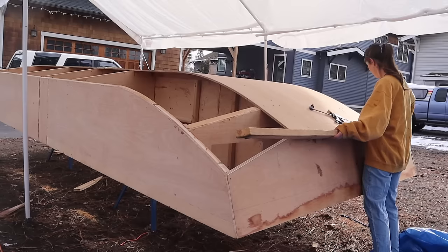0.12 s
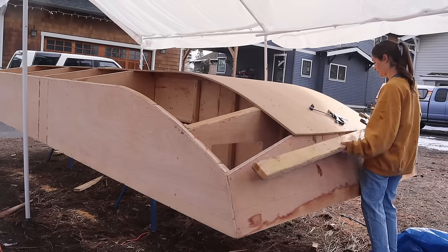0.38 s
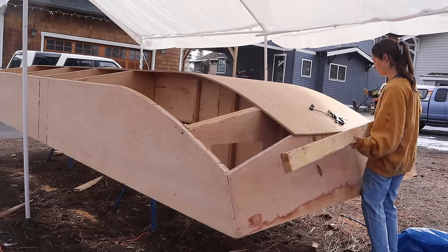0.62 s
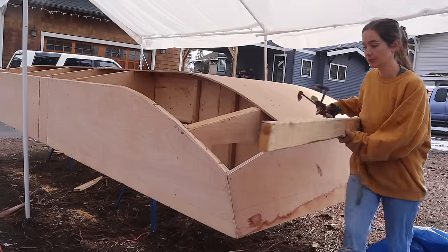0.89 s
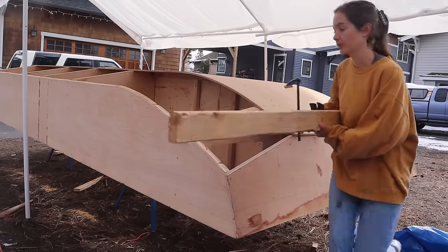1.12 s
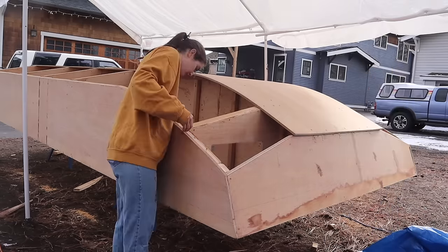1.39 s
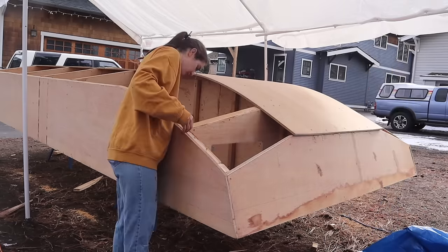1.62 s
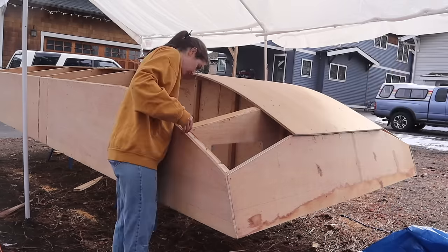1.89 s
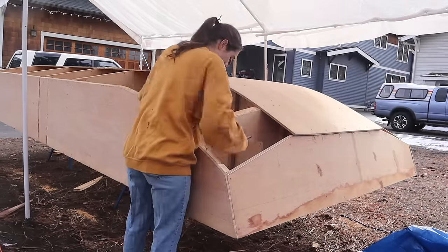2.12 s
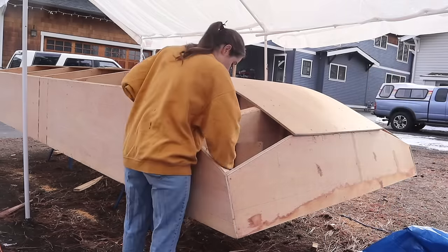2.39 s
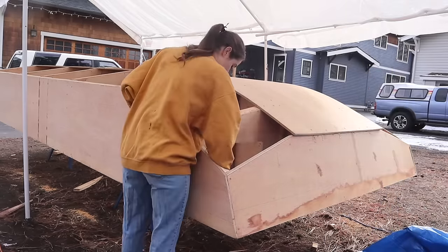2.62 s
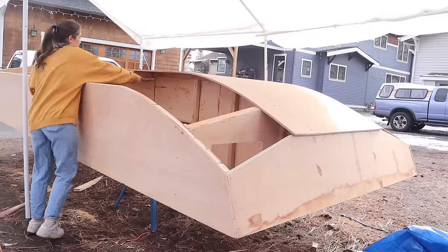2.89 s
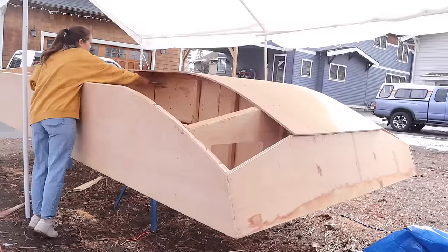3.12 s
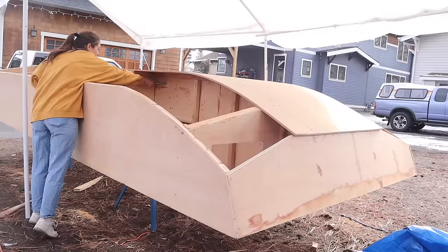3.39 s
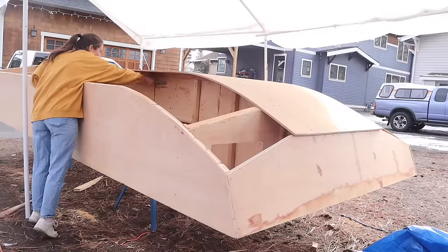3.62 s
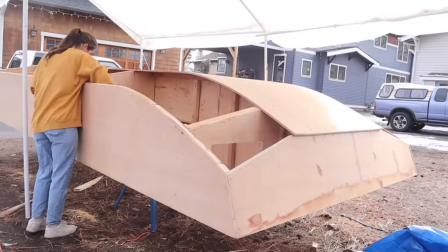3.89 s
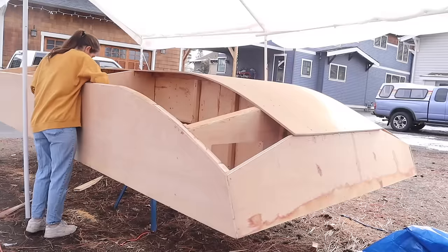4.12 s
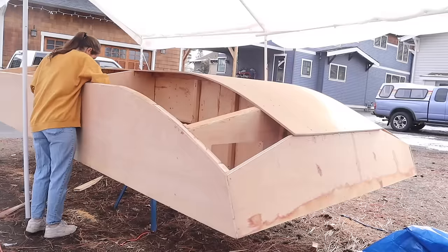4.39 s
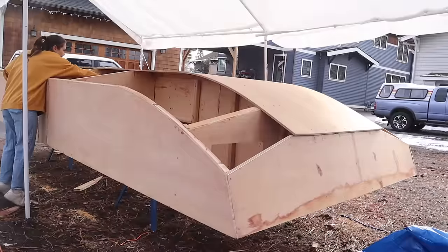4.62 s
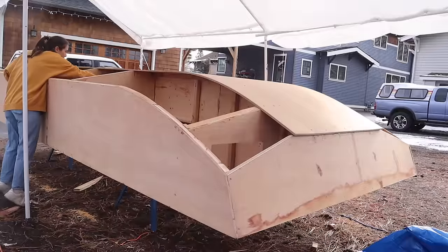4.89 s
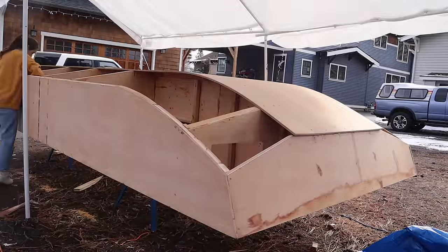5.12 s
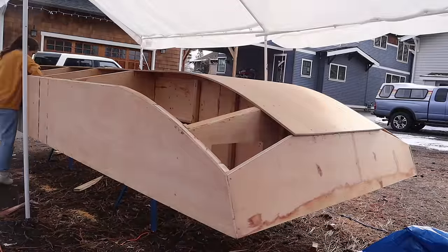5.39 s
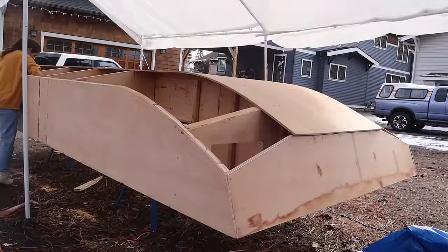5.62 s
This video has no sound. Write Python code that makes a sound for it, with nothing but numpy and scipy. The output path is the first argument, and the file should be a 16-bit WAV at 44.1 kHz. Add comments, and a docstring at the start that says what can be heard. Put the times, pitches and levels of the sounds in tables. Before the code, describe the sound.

A quiet yard with distant traffic hum and thin leaf hiss, heard closely in stereo. From 0 to 0.4 s, soft knocks on a hollow plywood hull build to a low, boomy thump. At 0.83 s a cut brings a short plank tap and crunching steps on dry litter until about 1.4 s, with sharp twig or cloth ticks. A dull bump at 1.39 s leads into a lull. Around 2.47 s a very loud, tight cluster of woody bangs rings out and is chopped at 2.82 s. More hollow knocks fall at 3.1-3.6 s, a faint metallic clamp rattle near 3.75 s, then sharper raps at 3.95 and 4.35 s. After a cut at 4.49 s, two knocks land around 4.6 s; a small bird whistles faintly at 4.5 and 4.8-5.0 s. Final loud blows at 5.1-5.2 s and a dull thud at 5.28 s decay into yard air, with slight ticks at 5.7 s.

```python
"""A yard: under a canopy, timber and tools knock against an upturned plywood hull.
The hollow hull rings and booms as sums of dying sines; a steel clamp and a loose plank do so more simply.
Boots crunch on dry litter and twigs tick (bursts of noise), a small bird warbles (gliding sines),
far traffic hums and leaves hiss (shaped noise).
Two close microphone ports hear it; loud blows overload, and splices stop some rings dead."""
import sys
import numpy as np
from scipy import signal
from scipy.fft import rfft, irfft, next_fast_len
from scipy.io import wavfile
from scipy.ndimage import uniform_filter1d

SR = 44100
rng = np.random.default_rng(int(sys.argv[2]) if len(sys.argv) > 2 else 0)


def store_pcm(level_fs):
    """Save levels as 16-bit WAV."""
    pcm = np.round(np.clip(level_fs, -1, 1) * 32767).astype(np.int16)
    wavfile.write(sys.argv[1], SR, np.atleast_2d(pcm).T)


def nominal_scale(level):
    """Amplitude ratio for a level in decibels (scalar or array-like)."""
    x = np.asarray(level, float) / 20
    return 10 ** x


N = 253575  # length of the scene in samples

# moments where rings stop and the yard noise steps in level: [t/s]
SPLICES = [.828, 1.388, 2.13, 2.821, 4.494, 5.13]


def at_hz(points, hz, column=1):
    """Read a table column at any pitch, along straight lines on log frequency."""
    points = np.array(points)
    return np.interp(np.log(hz), np.log(points[:, 0]), points[:, column])


def rms_one(x):
    """Scale a sound to an rms of 1."""
    return x / np.sqrt(np.mean(x ** 2) + 1e-20)


def coloured(x, spectrum):
    """Shape a steady sound to a spectrum."""
    hz = np.maximum(np.fft.rfftfreq(N, 1 / SR), 1)
    return irfft(rfft(x) * nominal_scale(at_hz(spectrum, hz)), N)


def drift(rate):
    """Wander at random: walk through random values at `rate` of them a second, joined by straight lines."""
    knots = rng.standard_normal(int(N / SR * 40) + 2)   # enough for rates up to 40
    return np.interp(np.arange(N) / SR * rate, np.arange(len(knots)), knots)


def ports(x, left_db, left_lag_us):
    """The nearer port hears a source sooner, and louder where the body shades short waves."""
    size = next_fast_len(N + 64)
    hz = np.fft.rfftfreq(size, 1 / SR)
    # each port gets half of the lag and half of the level difference, in opposite directions
    turn = np.exp(-1j * np.pi * hz * left_lag_us / 10 ** 6)
    turn = turn * nominal_scale(left_db / 2 * hz / (hz + 250))
    return irfft(rfft(x, size) * np.array([turn, 1 / turn]), size)[:, :N]


def modes(rows, t):
    """One dying sine for each row of (Hz, dB, seconds to fall by 60 dB)."""
    hz, level_db, t60 = np.transpose(rows)[:, :, None]
    return nominal_scale(level_db - 60 * t / t60) * np.sin(2 * np.pi * hz * t)


def diffuse(spectrum, low_hz, high_hz):
    """Noise from all round: alike at both ports in the bass, opposed in the treble; rms 1 between the pitches."""
    # how alike left and right are, 1 = same, -1 = opposed: [f/Hz, likeness]
    likeness = [(60, 1), (180, 0.98), (300, 0.78), (520, 0.7), (900, 0.11), (1500, -0.045), (2600, -0.65),
                (5000, -0.54), (10000, -0.54)]
    hz = np.maximum(np.fft.rfftfreq(N, 1 / SR), 1)
    alike = np.clip(at_hz(likeness, hz), -.99, .999)
    noise = rfft(rng.standard_normal((2, N))) * nominal_scale(at_hz(spectrum, hz))
    mid, side = noise * np.sqrt([1 + alike, 1 - alike])
    band = (hz > low_hz) & (hz < high_hz)
    scale = np.sqrt(2 * np.sum(np.abs(mid[band]) ** 2)) / N
    return irfft(np.array([mid + side, mid - side]), N) / scale


def yard():
    """Far traffic hums, leaves hiss, thin air noise flickers on top; the levels step at each splice."""
    # mean levels in each stretch between splices: [hum level/dB, hiss level/dB, air level/dB]
    stretches = [(-44, -61, -69), (-46.5, -57.5, -67.5), (-46.5, -56, -72.5), (-46, -61, -71),
                 (-47, -60, -68), (-50, -62.5, -69), (-47.5, -61, -71)]
    # relative spectrum of the traffic hum: [f/Hz, level per Hz/dB]
    hum_spectrum = [(20, 1.5), (40, 5.5), (110, 13), (200, 4.5), (400, -1), (800, -0.5), (1300, -8),
                    (2000, -21.5), (3000, -23), (9000, -62)]
    # relative spectrum of the leaves: [f/Hz, level per Hz/dB]
    hiss_spectrum = [(1000, 13), (1800, 8.5), (3000, 5), (4000, -1), (6000, -16), (9000, -38), (15000, -50)]
    # relative spectrum of the thin air noise: [f/Hz, level per Hz/dB]
    air_spectrum = [(3000, -4), (5000, 1.5), (8000, -1.5), (11000, -5), (13000, -10.5), (15000, -35)]
    stretch = np.searchsorted(SPLICES, np.arange(N) / SR)
    hum_db, hiss_db, air_db = np.transpose(stretches)[:, stretch]
    hum = nominal_scale(hum_db + 1.0 * drift(9)) * diffuse(hum_spectrum, 300, 1200)
    hiss = nominal_scale(hiss_db + 1.5 * drift(25)) * diffuse(hiss_spectrum, 2000, 5000)
    air = nominal_scale(air_db + 3.0 * drift(30)) * diffuse(air_spectrum, 5000, 14000)
    return hum + hiss + air


def contact(hard_hz, contact_ms):
    """A blow is a chatter of tiny hits: hard ones are bright and hardly move the low modes."""
    chance = rng.random((3, 4000))
    u = np.arange(4000) / (SR * max(contact_ms, .5) / 1000)
    hits = (chance[0] < 2500 / SR) * (0.29 + 1.0 * chance[1]) * np.sign(chance[2] - .5)
    chatter = hits * np.sqrt(u) * np.exp(-u ** 3)
    chatter[0] = 2.27 / max(contact_ms, .5)   # a short contact is one clean blow, a long one swells
    dull = signal.butter(2, np.clip(hard_hz, 50, 15000), fs=SR, output="sos")
    thin = signal.butter(1, np.clip(0.15 * hard_hz, 20, 5000), "high", fs=SR, output="sos")
    return signal.sosfilt(thin, signal.sosfilt(dull, chatter))


def hull():
    """Each blow cracks on the board and strikes all modes anew; gives direct and scattered sound."""
    # blows: [t/s, ring level/dB, contact hardness f/Hz, contact length/ms, boom level against the ring/dB]
    blows = [(0.058, -42, 600, 18, 3), (.137, -36, 820, 11.6, -27), (.274, -34, 600, 14, -40),
             (.353, -20, 700, 22, -1.5), (0.384, -29, 300, 48, 10), (1.389, -26, 510, 10, -41),
             (2.464, -5.5, 1166, 2.8, -29), (2.487, -8, 1290, 6.5, -35), (2.498, -8.5, 1200, 27.3, -45),
             (3.086, -14, 970, 10.8, -7.5), (3.182, -5, 1620, 12.4, -19), (3.238, -30, 820, 6.7, -16),
             (3.362, -15, 1065, 8.8, -36), (3.371, -12.5, 1650, 17.2, -12), (3.597, -30.5, 600, 25, -12),
             (3.955, -10.5, 1200, 2.04, -45), (3.982, -22.5, 475, 10, -16.5),
             (4.013, -23.5, 450, 12.8, -19), (4.3469, -11.5, 2250, 1.14, -34),
             (4.3749, -11, 2330, 1.77, -33), (4.380, -30.5, 2100, 310, -14), (4.451, -20.5, 670, 36, -10),
             (4.565, -13, 1510, 20.7, -18), (4.654, -6, 1210, 11.7, -17), (5.088, -12.5, 1470, 10.5, -33),
             (5.098, -3.5, 1840, 20, -24.5), (5.201, -4, 1600, 25.9, -23), (5.282, -19.5, 403, 40, -8)]
    # main panel modes: [f/Hz, relative level/dB, time to fall by 60 dB/s]
    panels = [(246.6, -4, 1), (282, -13, 0.5), (316, -6, 0.89), (361.4, 4, 0.42), (374, -11, 0.85),
              (475, -7, 0.44), (486, 11, 0.22), (510, -13, 0.19), (630, -4, 0.46), (687, -0.5, 0.31),
              (712, 5.5, 0.15), (746, -2.5, 0.33), (930, -8, 0.26), (929, -11, .15), (1130, -10, 0.17),
              (1220, -29.5, .2), (1238, 13, 0.046), (1340, -17.5, 0.12), (1570, -13, .2), (1547, 13, 0.044)]
    # air in the hollow hull: [f/Hz, relative level/dB, time to fall by 60 dB/s]
    air_modes = [(134.8, 0, 0.67), (156.1, -0.5, .6)]
    # dry crack of the struck spot: [share of the hardness pitch, time to fall by 60 dB/ms, relative level/dB]
    board = [(0.504, 12.6, -5), (1.3, 1.09, 2.5), (3.2, 0.73, 7.5)]
    # the crowd of fine modes and canopy echoes: [f/Hz, relative level/dB, time to fall by 60 dB/s]
    crowd_curve = [(176, -13, 0.79), (300, -6.5, 0.52), (600, -6, 0.39), (1200, -9, 0.32),
                   (2000, -13, 0.29), (4260, -17, 0.19), (9000, 6.5, 0.066)]
    t = np.arange(int(.7 * SR)) / SR
    hz = np.geomspace(170, 9000, 260) * rng.uniform(.99, 1.01, 260)
    crowd = modes(np.transpose([hz, at_hz(crowd_curve, hz), at_hz(crowd_curve, hz, column=2)]), t)
    body = np.vstack([modes(panels, t), crowd])
    boom = modes(air_modes, t).sum(axis=0) * (1 - np.exp(-t / 0.0039))   # the trapped air is slow to move
    no_bass = signal.butter(4, 280, "high", fs=SR, output="sos")
    out = np.zeros((2, N + 2 * len(t)))
    for s, level_db, hard_hz, contact_ms, boom_db in blows:
        strengths = rng.uniform(0.73, 0.76, (2, len(body))) * rng.choice([-1, 1], (2, len(body)))
        blow = contact(hard_hz, contact_ms)
        ring = signal.fftconvolve(strengths @ body, blow[None], axes=1)
        onset = ring[0, :int((contact_ms / 1000 + .02) * SR)]
        ring /= 3 * np.sqrt(np.mean(onset ** 2))
        crack_rows = [(share * hard_hz, db, t60_ms / 1000) for share, t60_ms, db in board]
        crack = modes(crack_rows, t).sum(axis=0)
        crack = signal.sosfilt(no_bass, crack)   # a small patch radiates no bass
        crack = signal.fftconvolve(crack, blow)
        crack_db = 15 - 2.5 * np.log2(contact_ms)   # longer contacts crack less
        ring[0] += nominal_scale(crack_db) * crack / np.abs(crack).max()
        ring[0, :len(t)] += nominal_scale(boom_db) * boom
        # the next splice stops the ring, with a 3 ms fade
        left_s = min([cut - s for cut in SPLICES if cut > s] + [9])
        ring *= np.clip((left_s - np.arange(ring.shape[1]) / SR) / .003, 0, 1)
        at = round(s * SR)
        out[:, at:at + ring.shape[1]] += nominal_scale(level_db) * ring
    return out[:, :N]


def ticks():
    """Twigs and cloth: a sharp snap and a short bright rustle, stronger across the ports."""
    # clear ticks: [t/s, level before filtering/dB]
    clear = [(0.233, -39), (0.7558, -38.5), (.9694, -26), (1.0845, -22.5), (1.2945, -35), (1.3294, -28.5),
             (1.8247, -35), (2.4062, -39.5), (2.4314, -37), (3.641, -41.5), (4.058, -42), (4.57, -19),
             (5.1048, -27.5), (5.189, -33.5), (5.221, -29), (5.6957, -25), (5.7218, -28.5)]
    # 25 faint ones are strewn at random
    faint = [(rng.uniform(0, N / SR), rng.normal(-48, 4)) for _ in range(25)]
    age = np.arange(900) / SR
    shape = .5 * np.exp(-age / 0.01) + np.exp(-age / 0.00073)   # rustle + snap
    out = np.zeros((2, N + 900))
    for s, level_db in faint + list(clear):
        at = round(s * SR)
        out[:, at:at + 900] += nominal_scale(level_db) * rng.standard_normal((2, 900)) * shape
    bright = signal.butter(2, [2500, 12000], "band", fs=SR, output="sos")
    mid, side = signal.sosfilt(bright, out[:, :N])
    return nominal_scale(-7.0) * mid + nominal_scale(-5.0) * side * [[1], [-1]]


def taps():
    """A loose plank taps: each tap is one short ringing pitch with a soft start."""
    # taps: [t/s, f/Hz, level before the soft start/dB]
    plank = [(0.272, 490, -21), (.834, 712, -12.5), (1.390, 256, -23)]
    t60_s, rise_s = .12, 0.0068
    out, t = np.zeros(N), np.arange(SR // 4) / SR
    for s, hz, level_db in plank:
        tap = modes([(hz, level_db, t60_s)], t)[0] * (1 - np.exp(-t / rise_s))
        out[round(s * SR):][:len(t)] += tap
    return out


def crunch():
    """Under the boots dry litter breaks in clumps of tiny snaps over a brushing hiss."""
    # treads: [t/s, length/s, first level/dB, last level/dB]
    treads = [(0.824, 0.14, -24.5, -21), (1.003, 0.096, -28.5, -34), (1.19, 0.098, -39, -34.5),
              (1.32, 0.062, -35, -45), (3.725, .1, -49.5, -47.5), (5.711, 0.029, -46.5, -53)]
    # relative spectrum of the litter: [f/Hz, level/dB]
    litter = [(300, -9.5), (700, -1), (1500, -3.5), (3000, -5), (5000, -8), (8000, -11), (12000, -63),
              (15000, -46)]
    attack_s, release_db_per_s = 0.012, 498
    t = np.arange(N) / SR
    level = np.zeros(N)
    for s, length, first_db, last_db in treads:
        held_db = np.interp(t, [s, s + length], [first_db, last_db])
        fall_db = release_db_per_s * np.maximum(t - s - length, 0)
        level += np.clip((t - s) / attack_s, 0, 1) * nominal_scale(held_db - fall_db)
    # a few snaps are much larger than the rest
    sizes = nominal_scale(4.5 * np.minimum(rng.exponential(1, (2, N)), 3.5)) * rng.choice([-1, 1], (2, N))
    snaps = sizes * (rng.random((2, N)) < 1400 / SR) * nominal_scale(2.5 * drift(39))
    brushing = 0.29 * rng.standard_normal((2, N))
    near, scattered = level * rms_one(coloured(snaps + brushing, litter))
    return ports(near, left_db=-4.0, left_lag_us=62.6) + nominal_scale(-9.5) * scattered * [[1], [-1]]


def clamp():
    """A steel clamp rings faintly: every jolt sets the same thin modes going, in a new mixture."""
    # jolts: [t/s, level/dB]
    jolts = [(2.489, -47), (3.184, -46), (3.74, -52), (3.79, -54), (4.66, -52)]
    # modes of the steel: [f/Hz, relative level/dB, time to fall by 60 dB/s]
    steel = [(5620, 0, .4), (6660, -12, .3), (8360, -5, .4), (10400, -10, .3)]
    out, t = np.zeros(N), np.arange(SR // 2) / SR
    for s, level_db in jolts:
        strengths = rng.uniform(0.46, 1, len(steel))
        out[round(s * SR):][:len(t)] += nominal_scale(level_db) * strengths @ modes(steel, t)
    return ports(out, left_db=4.0, left_lag_us=-52.5)


def bird():
    """Slightly hoarse whistles glide up to a top and down again, with a few echoes from the houses."""
    # notes, each an arch of pitch: [t/s, length/s, from f/Hz, top f/Hz, to f/Hz, level before echoes/dB]
    warbles = [(4.51, .115, 2300, 4300, 3100, -45), (4.822, .045, 5150, 5900, 5850, -51),
               (4.852, .054, 2800, 4050, 2900, -42), (4.908, .03, 2600, 3400, 3350, -45),
               (4.951, .036, 4200, 4900, 3400, -42), (4.992, .046, 2900, 4000, 3100, -43)]
    out = np.zeros(N)
    for s, length, from_hz, top_hz, to_hz, level_db in warbles:
        u = np.arange(int(length * SR)) / (length * SR)
        # the longer glide gets more of the time, so that both keep one pace
        crest = np.clip((top_hz - from_hz) / (2 * top_hz - from_hz - to_hz), .05, .95)
        arch = np.sin(np.pi * np.interp(u, [0, crest, 1], [0, .5, 1])) ** 1.5
        hz = top_hz - (1 - arch) * np.where(u < crest, top_hz - from_hz, top_hz - to_hz)
        whistle = np.sqrt(np.sin(np.pi * u)) * np.sin(2 * np.pi * np.cumsum(hz) / SR)
        out[round(s * SR):][:len(u)] += nominal_scale(level_db) * whistle
    out *= 1 + .45 * rms_one(uniform_filter1d(rng.standard_normal(N), size=40))   # hoarseness
    for lag_s, echo_db in [(.006, -7), (.017, -11), (.041, -16)]:
        out = out + nominal_scale(echo_db) * np.roll(out, round(lag_s * SR))
    return ports(out, left_db=10.0, left_lag_us=-140)


def scene():
    """Add up all sources at the two ports."""
    direct, scattered = hull()
    # long waves are alike at both ports, so the scattered part has little bass
    no_bass = signal.butter(1, 900, "high", fs=SR, output="sos")
    scattered = signal.sosfilt(no_bass, scattered)
    wood = ports(direct + taps(), left_db=1.5, left_lag_us=-60)
    wood = wood + nominal_scale(-6.5) * scattered * [[1], [-1]]
    return yard() + wood + ticks() + crunch() + clamp() + bird()


def band_limit(x):
    """A steep low-pass at the top of the band."""
    return signal.sosfilt(signal.butter(12, 15000, fs=SR, output="sos"), x)


def record(dry):
    """The microphone lifts the treble across the ports, and the loudest blows overload."""
    treble = signal.butter(2, 8000, "high", fs=SR, output="sos")
    side = signal.sosfilt(treble, (dry[0] - dry[1]) / 2)
    wide = dry + nominal_scale(-3.0) * side * [[1], [-1]]
    return band_limit(np.clip(wide, -1, 1))


dry = scene()
out = record(dry)
store_pcm(out)
```